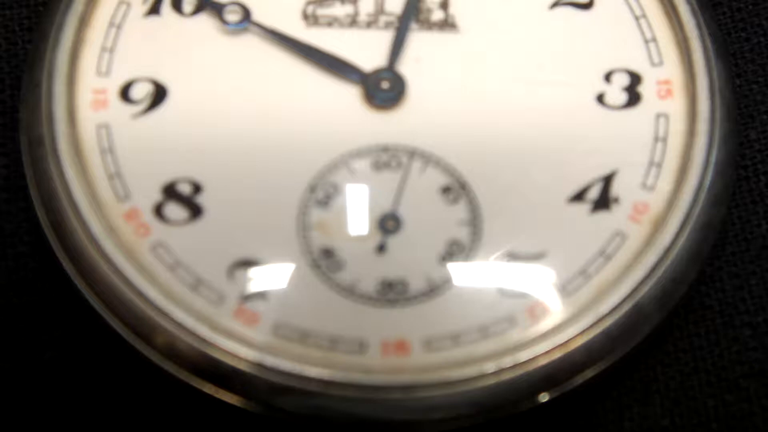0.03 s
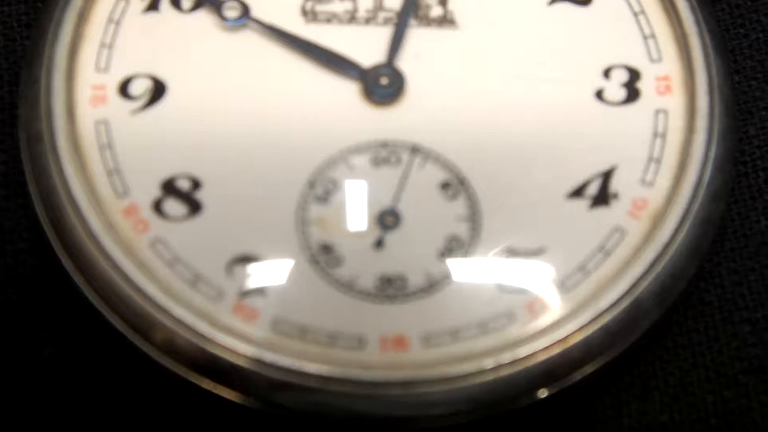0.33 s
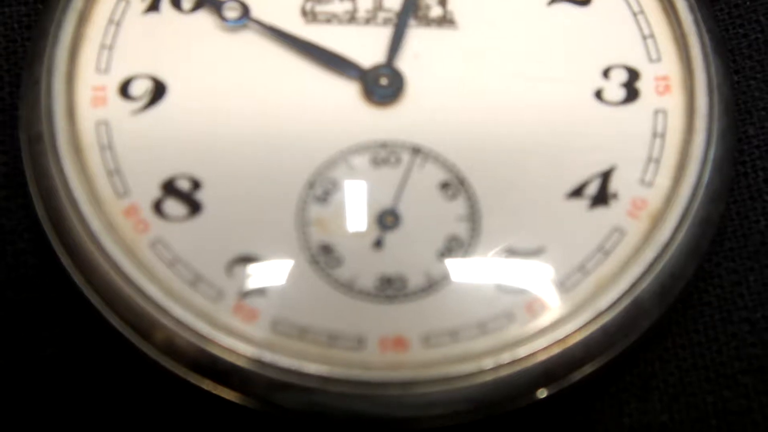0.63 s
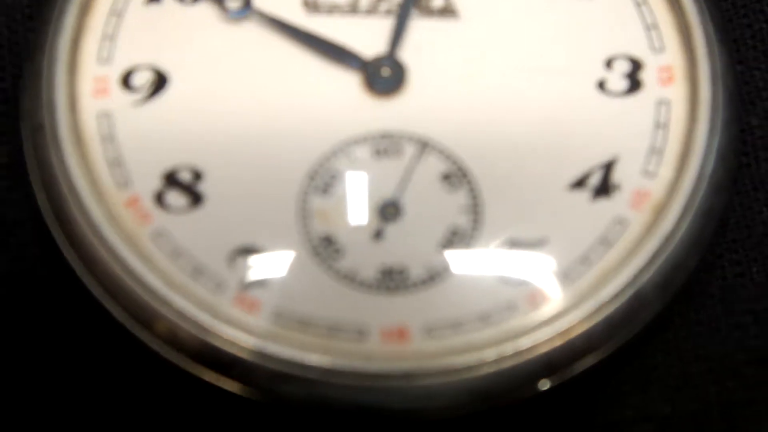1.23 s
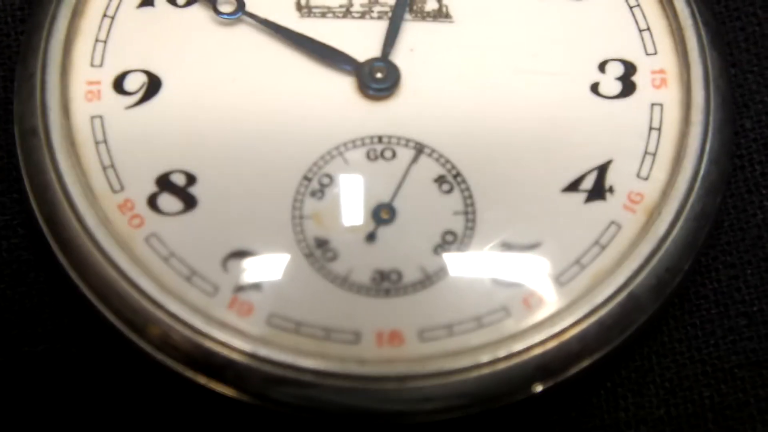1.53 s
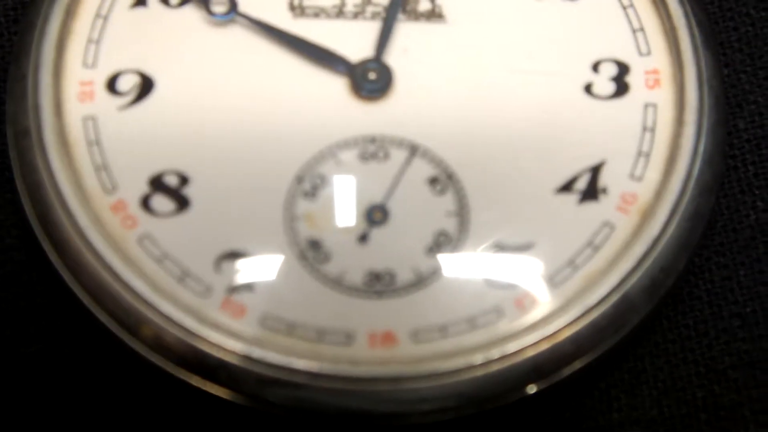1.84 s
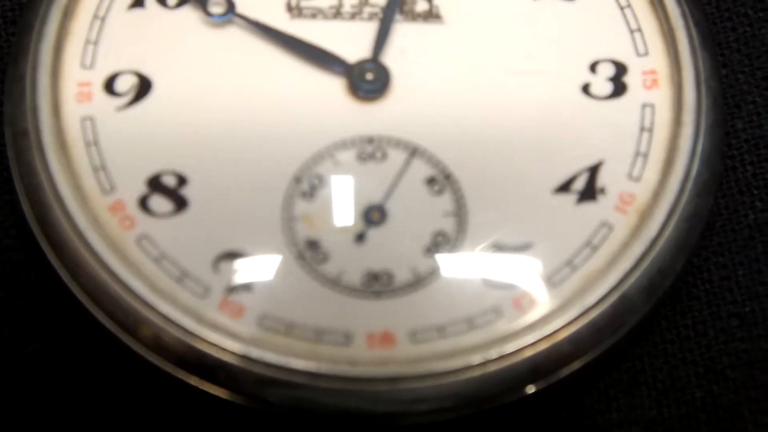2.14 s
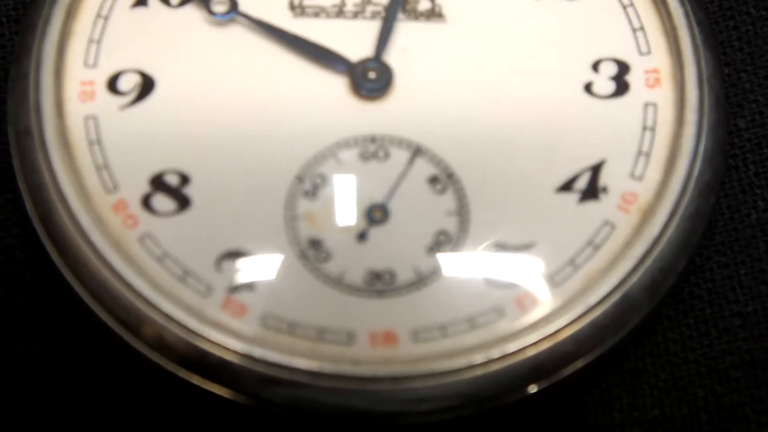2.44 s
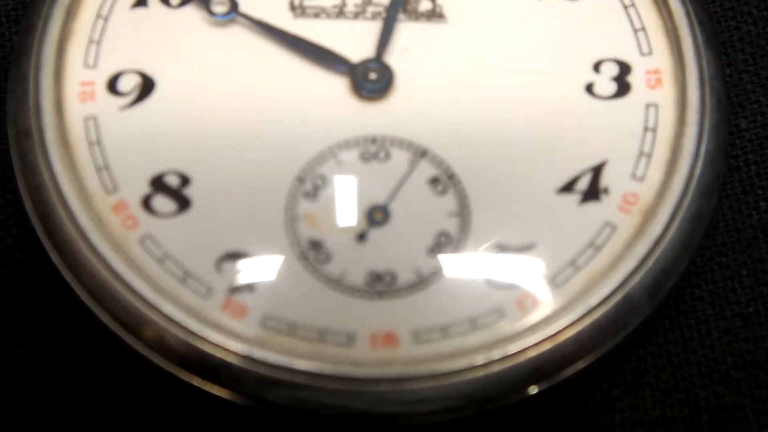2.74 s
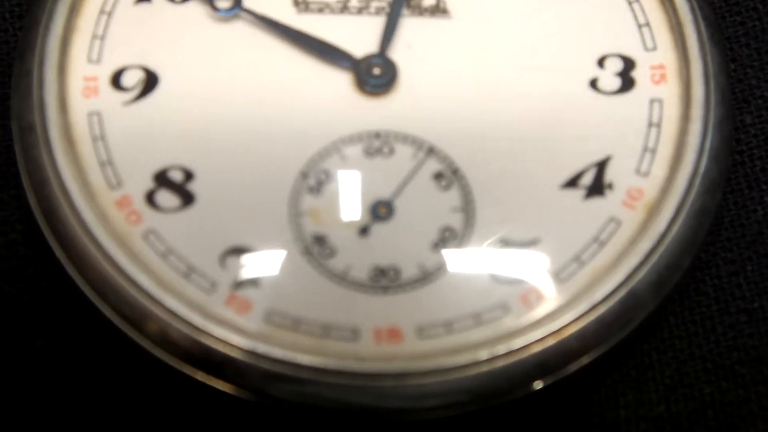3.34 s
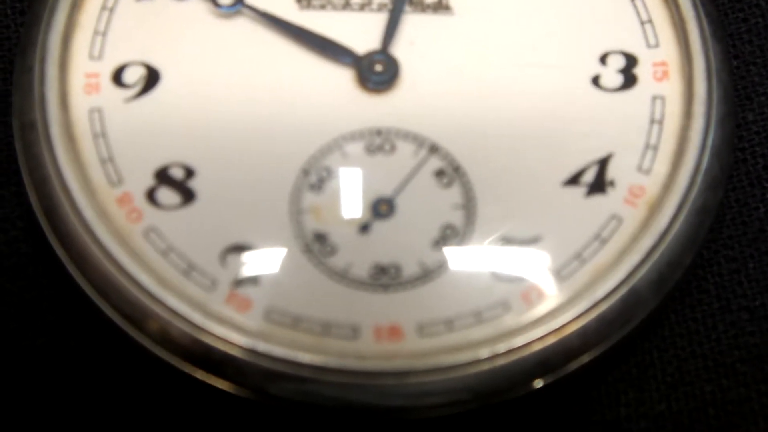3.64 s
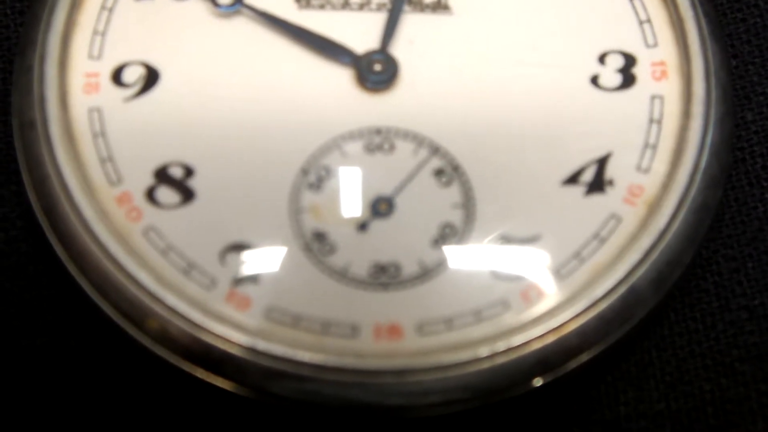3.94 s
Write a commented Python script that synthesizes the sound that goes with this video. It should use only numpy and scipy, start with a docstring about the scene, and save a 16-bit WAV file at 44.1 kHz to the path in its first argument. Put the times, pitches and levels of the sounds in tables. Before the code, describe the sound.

Close to the microphone, a pocket watch gives quick, thin, regular ticks, barely rising above a quiet room's constant low rumble, hiss and slight motor whine. Around the middle there is a single faint tap.

```python
"""A quiet room, with a pocket watch lying on cloth close by.
A steady rumble, like ventilation, makes the room resonate under hiss, hum and a faint motor whine.
The watch's escapement (the part that lets the gears step on) beats five times a second: its steel
parts strike and ring, tiny and very high. A fainter, higher click comes just before most beats.
About halfway through there is one faint tap."""
import sys
import numpy as np
from scipy import signal
from scipy.fft import rfft, irfft
from scipy.io import wavfile
from scipy.ndimage import uniform_filter1d

SR = 44100
rng = np.random.default_rng(int(sys.argv[2]) if len(sys.argv) > 2 else 0)


def log_audio(samples):
    """Write samples as a 16-bit WAV file to the path given in sys.argv[1]."""
    # one column per channel
    frames = np.atleast_2d(samples).T
    # limit to full scale, then quantise
    limited = np.clip(frames, -1, 1)
    pcm = np.round(limited * 32767).astype(np.int16)
    wavfile.write(sys.argv[1], SR, pcm)


N = 176400  # 4 seconds


def undb(db):
    """Turn decibels into a number to multiply by."""
    return 10 ** (np.asarray(db) / 20)


def curve(points, freqs):
    """Join (Hz, value) points with straight lines, giving every octave equal room."""
    hz, values = np.array(points, float).T
    return np.interp(np.log(freqs + 1e-3), np.log(hz), values)


def pan(db):
    """Left and right gains that make the left side louder by db."""
    return undb(np.array([[.5], [-.5]]) * db)


def wander(per_second):
    """A smooth random wobble around 0, with a typical size of 1."""
    hold = int(SR / per_second)
    steps = np.repeat(rng.standard_normal(N // hold + 1), hold)
    smooth = uniform_filter1d(uniform_filter1d(steps, hold), hold)[:N]
    return (smooth - smooth.mean()) / smooth.std()


def room_air():
    """Rumble and hiss, boosted where the room resonates; the bass is alike in both ears, the treble not."""
    # Each row: frequency in Hz, noise level in dB.
    noise_shape = [(22, -97), (34, -79.5), (66, -92), (88, -70.5), (125, -58.5), (175, -61.5), (200, -72),
                   (250, -66.5), (300, -64.5), (390, -61.5), (480, -68), (560, -66.5), (800, -68),
                   (1050, -71.5), (1500, -72), (2300, -71.5), (3100, -76.5), (4200, -78.5), (5100, -83.5),
                   (6200, -85), (7800, -90), (9300, -95.5), (12000, -98.5), (13800, -101.5), (15600, -103)]
    # Each row: a room resonance in Hz, its half-width in Hz, its relative peak level in dB.
    resonances = [(97.6, 4.4, -61), (128.8, 6, -55), (155.2, 13.5, -53), (177.5, 8.7, -56),
                  (217.5, 8.9, -52.5), (278.4, 9.1, -58.5), (321, 19, -59.5), (375, 28, -71),
                  (546, 13.2, -62.5), (592, 17, -68), (1017, 53, -68), (1351, 18, -68), (2226, 33, -70)]
    # Each row: frequency in Hz, how alike the two sides are (1 the same, 0 unrelated, -1 opposite).
    likeness = [(60, 0.97), (150, 1), (300, 0.94), (640, 0.9), (1000, 0.71), (1400, 0.72), (2000, 0.15),
                (2700, 0.056), (3800, 0.11), (4400, -0.18), (5200, -0.5), (6000, -0.31), (7000, -0.012),
                (8100, .43), (9500, 0.045), (11700, -.15), (15000, -.05)]
    # Each row: frequency in Hz, how much louder the left side is in dB.
    lean = [(100, 1.4), (220, 1), (380, 2), (700, 1.5), (1290, 2), (2500, -1.4), (4200, 4.5), (5800, 3.5),
            (7300, 0), (10000, .8), (15000, -0.5)]
    resonance_db, flicker_db = -0.5, 0.31
    freqs = np.arange(N // 2 + 1) * SR / N
    power = undb(curve(noise_shape, freqs)) ** 2
    for hz, half_width, db in resonances:
        power += (undb(db + resonance_db) / (1 + ((freqs - hz) / half_width) ** 2)) ** 2
    shared, opposed = rfft(rng.standard_normal((2, N)))
    alike = np.clip(curve(likeness, freqs), -1, 1)
    stereo = shared * np.sqrt((1 + alike) / 2) + np.array([[1], [-1]]) * opposed * np.sqrt((1 - alike) / 2)
    air = irfft(stereo * np.sqrt(power * SR / 2) * pan(curve(lean, freqs)), N)
    return air * undb(flicker_db * wander(per_second=14))


def hum():
    """Tones from a motor and the mains supply, each wavering a little in pitch and level."""
    # Each row: pitch in Hz, level in dB, how much louder the left side is in dB,
    # how far the left wave runs ahead in radians, level waver in dB.
    tones = [(59, -65, 0, 0, 2), (82, -49.5, 1.8, 0.15, 1), (118.3, -45, 1.2, 0, 1.5),
             (235, -53, 3.5, 0.49, 2.5), (351, -47.5, 7, 0.36, 2), (743, -58, 2, 0, 2),
             (888, -57.5, 3, 0, 2), (1292, -59.5, 5, .5, 2.5), (1351, -54.3, 8, 0.81, 2),
             (1765, -54, -5.5, 0.1, 1), (2354, -61.5, 1, .5, 2), (2998, -62.5, 6.5, 1.2, 1.5),
             (4645, -61.2, 6.5, .3, .6)]
    drift_hz = 0.49
    out = np.zeros((2, N))
    for hz, db, lean_db, lead, waver_db in tones:
        phase = 2 * np.pi * np.cumsum(hz + drift_hz * wander(per_second=5.006)) / SR
        tone = np.sqrt(2) * np.sin(phase + np.array([[.5], [-.5]]) * lead)
        out += tone * pan(lean_db) * undb(db + waver_db * wander(per_second=4.05))
    return out


def steel_ticks(events, contacts, rings):
    """Each tick is a quick cluster of steel contacts that ring briefly; wider rings die sooner."""
    ring_samples, rise_s = SR // 25, .0005
    lead_rad = 1.2  # the left side hears the watch slightly earlier
    out = np.zeros((2, N))
    for start_s, tick_db in events:
        for delay_s, contact_db in contacts:
            start = int((start_s + delay_s) * SR)
            age = np.arange(min(ring_samples, N - start)) / SR
            rise = 1 - np.exp(-age / rise_s)
            for hz, width, ring_db in rings:
                phase = 2 * np.pi * (hz * age + rng.random()) + np.array([[.5], [-.5]]) * lead_rad
                ring = np.sin(phase) * np.exp(-np.pi * width * age)
                out[:, start:start + len(age)] += ring * rise * undb(tick_db + contact_db + ring_db)
    return out


def watch_beats():
    """The escapement pings with a slight limp: it unlocks, pushes, drops (the loudest) and rebounds."""
    # Each row: time of the drop in seconds, relative strength in dB.
    beats = [(.123, 2), (.3203, 4), (.5232, 2), (.7202, 3), (.9234, 0), (1.1205, 1), (1.3234, 0),
             (1.5205, -1), (1.7227, -5), (1.9209, -3), (2.1234, 0), (2.32, 0), (2.5233, -3), (2.7202, -1),
             (2.924, -1), (3.12, 1), (3.3236, 1), (3.5207, 0), (3.7235, -1), (3.92, -1.5)]
    # Each row: a contact's time in seconds after the drop (negative is before), relative level in dB.
    contacts = [(-.011, -14), (-.006, -19), (0, 1), (.0016, -8)]
    # Each row: ringing pitch in Hz, width in Hz, relative level in dB.
    rings = [(10400, 330, -3), (10800, 400, -7), (11350, 350, -4), (11900, 350, -5.5), (12600, 200, -9),
             (12850, 140, -5)]
    return steel_ticks(beats, contacts, rings) * undb(-44) * pan(db=3.5)


def watch_clicks():
    """A fainter, drier click about 50 ms before most beats: one strike and two rattles."""
    # Each row: start in seconds, relative strength in dB.
    clicks = [(.2673, -3), (.4726, 1), (.6664, -4), (.8718, -5), (1.0662, 6), (1.2725, 7), (1.4674, -1),
              (1.6716, -2), (1.8676, -1), (2.0732, -2), (2.4736, 3), (2.6663, 1), (2.8727, 3), (3.068, -5),
              (3.2728, 0), (3.468, -1), (3.673, 2), (3.8668, -6)]
    # Each row: a contact's time in seconds after the strike, relative level in dB.
    contacts = [(0, 0), (.0008, -3), (.002, -5)]
    # Each row: ringing pitch in Hz, width in Hz, relative level in dB.
    rings = [(9700, 600, -2), (10900, 900, -4), (12000, 700, -1.5), (13400, 600, -1.5), (14600, 300, -4.5),
             (15030, 250, -3)]
    return steel_ticks(clicks, contacts, rings) * undb(-51) * pan(db=-1)


def tap():
    """One faint tap nearby: a few milliseconds of noise gathered around one pitch."""
    peak_s, spread_s, pitch_hz, width_hz, level_db = 2.082, 0.0025, 3480, 350, -37
    freqs = np.arange(N // 2 + 1) * SR / N
    ring = irfft(rfft(rng.standard_normal(N)) / (1 + (2 * (freqs - pitch_hz) / width_hz) ** 2), N)
    burst = np.exp(-((np.arange(N) / SR - peak_s) / spread_s) ** 2)
    return ring / ring.std() * undb(level_db) * burst


def scene():
    """The watch in the humming room, and one faint tap."""
    return room_air() + hum() + watch_beats() + watch_clicks() + tap()


def record(dry):
    """The sound starts abruptly, rises a little to its full level, and has its highest treble cut off."""
    start_s, start_db, settle_s, top_hz = .072, -1.5, 0.32, 15700
    age = np.arange(N) / SR - start_s
    gain = (age >= 0) * undb(start_db * np.exp(-np.maximum(age, 0) / settle_s))
    treble_cut = signal.ellip(12, .1, 80, top_hz, fs=SR, output="sos")
    return signal.sosfilt(treble_cut, dry * gain)


dry = scene()
out = record(dry)
log_audio(out)
```